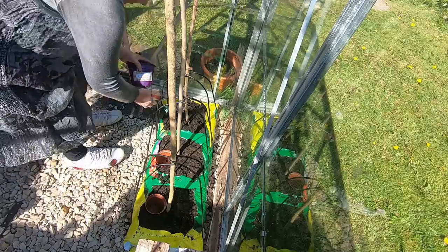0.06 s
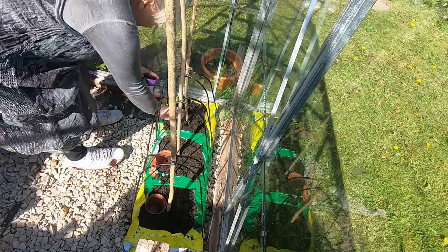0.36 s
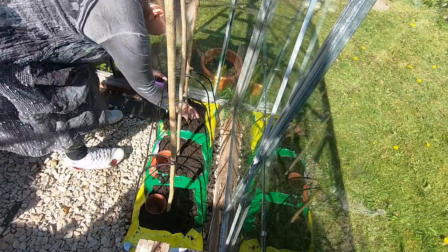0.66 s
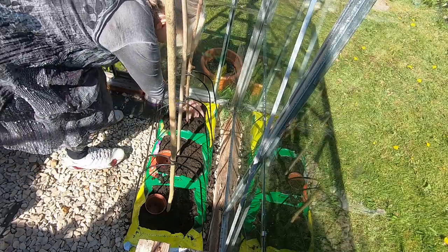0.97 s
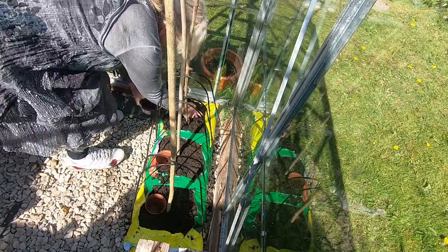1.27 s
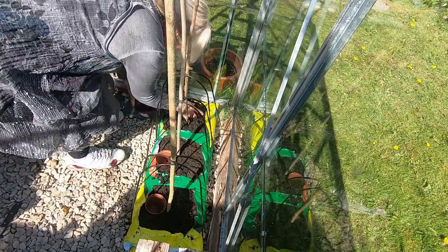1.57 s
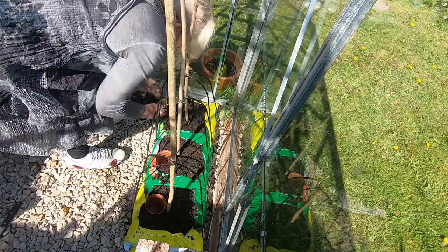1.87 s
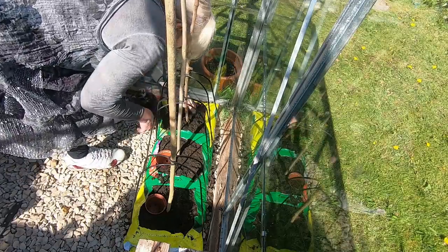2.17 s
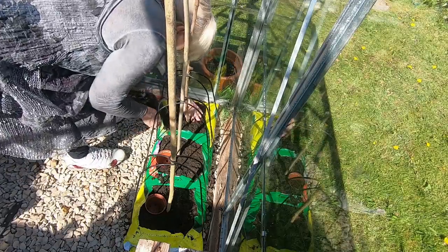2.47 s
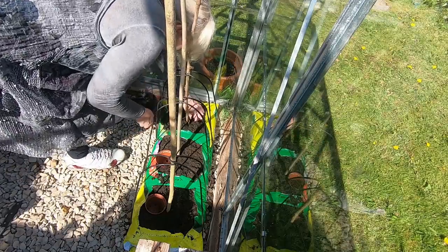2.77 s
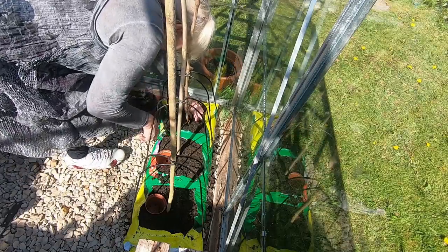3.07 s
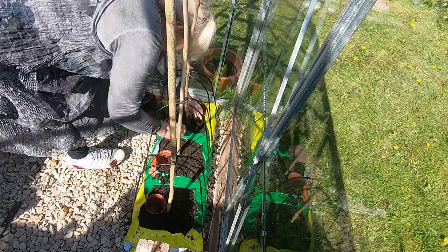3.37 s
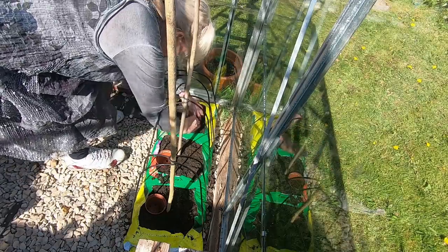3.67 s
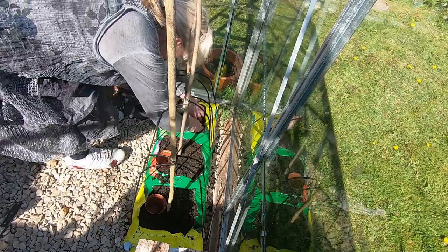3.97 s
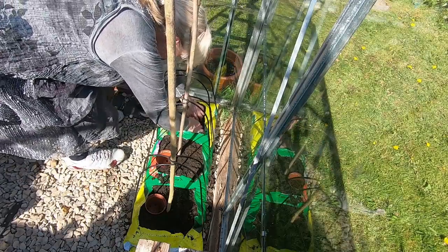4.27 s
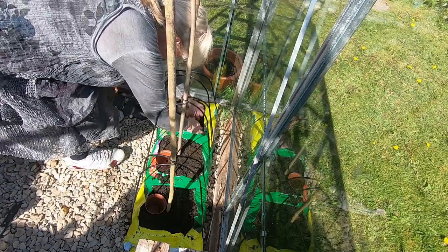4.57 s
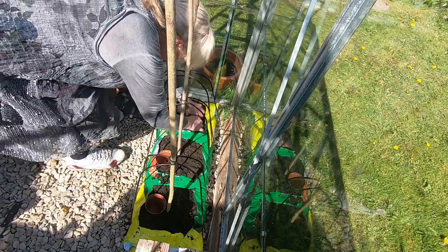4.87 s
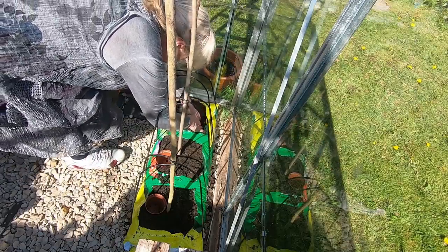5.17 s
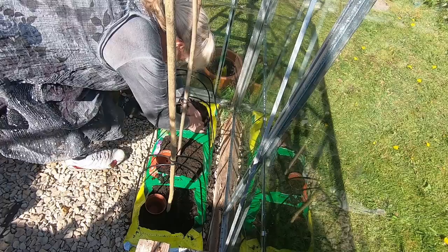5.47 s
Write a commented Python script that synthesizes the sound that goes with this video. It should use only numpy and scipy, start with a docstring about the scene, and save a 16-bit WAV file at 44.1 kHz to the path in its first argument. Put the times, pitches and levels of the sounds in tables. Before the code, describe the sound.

Quiet, close gardening sounds fill a small greenhouse: compost crumbles, sleeves and leaves swish, and a full plastic bag shifts dully, with scattered light ticks of plastic and grit. Outside, a light wind rumbles and a distant engine hums faintly throughout. A far bird whistles several short notes from the start until about 2.2 seconds. Soft pats come near 0.6 and 1.1 seconds, a gritty scrape at 1.6, and a quick cluster of dull pats between 2.6 and 2.8. After a short lull, a plastic pot is set down at 3.8 seconds, the loudest moment: a low hollow thump that rings briefly, a crunch of grit and a sharp clack of its rim on stone, with a tight echo off the glass. Gentler pats, scrapes and clicks follow around 4.4 and 5.2 seconds, and the rustling picks up again just before the end at about 5.7 seconds.

```python
"""A small greenhouse, where someone kneels and firms a plant into a bag of compost.
Sleeves and leaves swish, crumbs and plastic tick, hands pat the soil and push through grit.
A pot is set down with a hollow thump, and its rim clacks on stone; the knocks echo off the glass.
Outside, a light wind rumbles, an engine drones and a bird whistles far away."""
import sys
import numpy as np
from scipy import signal
from scipy.fft import rfft, irfft
from scipy.io import wavfile
from scipy.ndimage import uniform_filter1d

SR = 44100
rng = np.random.default_rng(int(sys.argv[2]) if len(sys.argv) > 2 else 0)


def master(y):
    """Save y as 16-bit WAV."""
    cut = np.clip(np.atleast_2d(y).T, -1, 1)
    pcm = np.round(cut * 32767)  # scale
    wavfile.write(sys.argv[1], SR, pcm.astype(np.int16))


N = 252322

# The tone of each noise layer. Each row: frequency in Hz, relative spectral level in dB.
CRUMB_TONE = [(250, -13), (600, -5), (1300, 10.5), (2200, 3.5), (3600, 1.5), (5300, -2.5), (7500, -13),
              (14000, -31.5)]
SWISH_TONE = [(2000, -21), (4500, -5), (6000, -4.5), (8000, -6), (10300, -5), (11700, -12), (13500, -13.5),
              (15000, -29)]
PLASTIC_TONE = [(2500, -9.5), (4300, -1.5), (5500, -7), (7000, -7), (8000, -3), (8800, -11), (11000, -25.5)]
BAG_TONE = [(60, -11), (120, 3.5), (180, 3.5), (280, 2.5), (400, -5), (600, -14.5), (1200, -16.5),
            (3000, -51.5)]
GARDEN_TONE = [(59, -28.5), (100, -8), (140, -18.5), (162, 1.5), (196, -8.5), (291, -9), (391, -7.5),
               (443, -5.5), (535, -5), (885, -7), (1880, -47), (3320, -47), (3840, -35.5), (15000, -61.5)]
WIND_TONE = [(12, -25.5), (28, -6.5), (44, 1.5), (60, -2), (80, -2), (100, -7.5), (135, -20), (300, -39),
             (1000, -87)]
GRIT_TONE = [(100, -16), (250, 9.5), (600, 4.5), (1400, -2), (2400, -3), (3600, -6), (5200, -7.5),
             (6400, -21.5), (10300, -28.5), (14000, -39)]
# Stereo width of diffuse sound. Each row: frequency in Hz, side over mid in dB.
WIDTH = [(60, -24), (150, -9.5), (280, -9.5), (450, -6.5), (750, 4.5), (1300, 1.5), (2400, -3),
         (4400, -5.5), (9000, 1)]
# How hard the hands work the compost. Each row: time in seconds, relative level in dB.
EFFORT = [(0.0, -7), (0.6, -7.5), (0.95, 0.5), (1.22, -7), (1.7, -2), (1.93, -11), (2.42, -11),
          (2.66, -0.5), (3.0, -13.5), (3.42, -13.5), (3.75, 2), (3.95, 0), (4.15, -6), (4.46, -4.5),
          (4.7, -3.5), (4.85, -13), (5.25, -10), (5.72, 0.5)]
# A sleeve or leaf slides past. Each row: start and length in seconds, level in dB.
STROKES = [(0.445, 0.078, -66), (0.575, 0.12, -64), (0.7, 0.095, -66.5), (0.87, 0.51, -73),
           (1.25, 0.42, -68.5), (1.61, 0.2, -65.5), (2.17, 0.42, -83), (2.57, 0.14, -74), (3.46, 0.17, -69),
           (3.61, 0.26, -64.5), (4.05, 0.093, -77), (4.17, 0.1, -69.5), (4.49, 0.029, -72),
           (4.64, 0.13, -73), (4.85, 0.6, -79.5), (5.55, 0.15, -76)]
# Gusts over the breeze. Each row: start and length in seconds, relative level in dB.
GUSTS = [(0.1, 0.55, -49), (0.59, 0.17, -48), (0.82, 0.29, -49.5), (1.15, 0.43, -49.5), (1.49, 0.15, -49.5),
         (2.08, 0.48, -52.5), (2.52, 0.61, -56), (3.63, 0.13, -47.5), (3.8, 0.52, -44), (4.35, 0.35, -46.5),
         (4.68, 0.24, -48.5), (5.17, 0.12, -54), (5.3, 0.63, -56)]
# The engine's swells. Each row: time in seconds, relative levels of fundamental and octave in dB.
ENGINE_LEVELS = [(0.0, -61, -81), (0.46, -47, -64.5), (0.56, -63, -67.5), (0.95, -55.5, -66),
                 (1.4, -77, -64.5), (1.8, -74, -80), (2.7, -55, -72.5), (3.2, -72.5, -73),
                 (5.72, -67, -83.5)]
# Bird notes. Each row: start and length in seconds, first and last pitch in Hz, relative level in dB.
BIRD_NOTES = [(0.064, 0.18, 2190, 2323, -64), (0.329, 0.31, 1886, 1920, -64.5),
              (0.86, 0.15, 1960, 1918, -62), (1.021, 0.152, 2026, 1935, -62),
              (1.146, 0.054, 5150, 5100, -70), (1.344, 0.15, 2093, 2095, -65.5),
              (1.871, 0.13, 2506, 2920, -65.5), (2.11, 0.077, 3850, 3670, -67.5)]
# Ticks of plastic and grit. Each row: start in seconds, relative level in dB, pitch in Hz,
# crisp edge against the body in dB, contact time in seconds.
TICKS = [(0.244, -60.5, 4130, -13, 0.0015), (0.33, -60, 4250, -24, 0.019), (0.442, -60.5, 2950, 6, 0.0022),
         (0.46, -56, 4500, -9, 0.0064), (0.719, -60, 5100, -29, 0.011), (0.739, -54, 2200, -14, 0.002),
         (0.892, -51, 2720, -0.5, 0.0025), (1.11, -56, 1480, -9, 0.0017),
         (1.3339, -50.5, 1450, -9, 0.00051), (1.675, -56, 9800, -23, .002),
         (2.507, -60.5, 2240, -36, .0025), (2.593, -57, 1510, -16, 0.002), (2.686, -47, 3740, -51, 0.0059),
         (2.794, -58.5, 2640, -18, 0.0027), (3.744, -54.5, 3420, -0.5, 0.016),
         (3.845, -45, 4000, 4.5, .001), (3.856, -44.5, 4040, -3.5, 0.0018), (4.062, -60, 5400, -25, 0.0045),
         (4.302, -64, 3450, 1, 0.013), (4.507, -49.5, 1342, -7, 0.00048), (4.7327, -48.5, 847, -38, 0.0005),
         (5.276, -63, 2120, -29.5, .001), (5.327, -64, 1944, -16, 0.0059), (5.611, -50.5, 1460, -27, 0.001)]
# The plastic pot's hollow resonances. Each row: centre and width in Hz, relative level in dB.
POT_RESONANCES = [(1360, 52, -4), (2040, 220, -17.5), (3480, 730, 0), (4880, 540, -11)]
# Soft blows on bag and ground. Each row: start in seconds, relative level in dB, pitch in Hz.
PATS = [(0.624, -51.5, 234), (1.11, -47.5, 304), (1.679, -52, 300), (2.151, -48, 170), (2.59, -46, 177),
        (2.613, -44.5, 254), (2.635, -40.5, 85.5), (2.724, -37.5, 171), (2.735, -44.5, 272),
        (2.83, -49.5, 174), (3.812, -38, 224), (3.83, -31.5, 164), (3.885, -37.5, 217.6),
        (3.93, -42.5, 252), (4.007, -40.5, 110), (4.367, -45, 134), (4.389, -45, 202), (5.185, -42.5, 60.4),
        (5.61, -55.5, 365)]
# Pushes through compost and gravel. Each row: start in seconds, relative level in dB,
# fade time in seconds, tilt in dB per octave, pot ring against the grit in dB.
SCRAPES = [(1.601, -43.5, 0.0031, 4.5, -8), (1.616, -50, 0.029, 2.5, -10), (1.681, -51, 0.031, -4.5, 3),
           (1.71, -52.5, 0.028, 1.5, -7), (2.338, -60.5, 0.045, -6, -28), (2.688, -53, 0.02, 0.5, -26),
           (3.8156, -30, 0.0066, 1.6, -11), (3.835, -45.5, 0.032, -1.5, -26),
           (3.895, -44, 0.042, -3.5, -29), (4.386, -63.5, 0.088, -1.5, -33), (4.447, -49, 0.0086, -4, -28)]
# The landing's boom. Each row: frequency in Hz, relative level in dB, seconds to fall by 60 dB.
BOOM_MODES = [(82.85, -2.5, 1.1), (158.4, -1, 0.68), (180.6, -3.5, 0.84), (245, -2.5, 0.31),
              (313, -11.5, 0.67), (421, -20, 0.36), (476, -3.5, 0.34), (713, -23.5, 1.2), (847, -21, 0.45)]
# The rim's hits on stone. Each row: start in seconds, relative level in dB, pitch in Hz.
RIM_HITS = [(3.8632, -11, 3250), (3.86433, -11, 3250)]
# The greenhouse's reverb. Each row: frequency in Hz, seconds to fall by 60 dB.
ROOM_DECAY = [(100, 0.53), (300, 0.13), (800, 0.16), (3000, 0.13), (10000, 0.16)]
# The microphone's treble roll-off. Each row: frequency in Hz, gain in dB.
MICROPHONE = [(10400, 0), (11600, -5.5), (13000, -6), (15000, -12)]


def amp(db):
    """Decibels to gain."""
    return 10 ** (np.asarray(db) / 20)


def unit_rms(x):
    """Scales to rms 1."""
    return x / np.sqrt(np.mean(x ** 2) + 1e-20)


def curve_at(points, hz):
    """Reads a curve on a log-frequency axis."""
    point_hz, value = np.transpose(points)
    return np.interp(np.log(hz + 1), np.log(point_hz + 1), value)


def fader(rows, column=1):
    """One dB column of a timeline as a gain for each sample."""
    rows = np.array(rows)
    return amp(np.interp(np.arange(N) / SR, rows[:, 0], rows[:, column]))


def equalise(x, tone):
    """Filters by a tone curve."""
    size = x.shape[-1]
    return irfft(rfft(x) * amp(curve_at(tone, np.fft.rfftfreq(size, 1 / SR))), size)


def band(x, lo_hz, hi_hz, order=1):
    """Causal band-pass."""
    sections = signal.butter(order, [lo_hz, min(hi_hz, .48 * SR)], "band", fs=SR, output="sos")
    return signal.sosfilt(sections, x)


def hit_at_level(x, db):
    """Gives a short sound the energy of 10 ms at this level."""
    return amp(db) * x * np.sqrt(0.01 * SR / np.sum(x ** 2))


def add(mix, start_s, sound):
    """Mixes a sound in at its cue."""
    part = mix[round(start_s * SR):][:len(sound)]
    part += sound[:len(part)]


def spread(pair):
    """A mid and a side signal become left and right, alike in the bass."""
    side = equalise(pair[1], WIDTH)
    return np.array([pair[0] + side, pair[0] - side])


def grains(size, per_s, spread_db):
    """Sparse clicks of random sign and uneven size."""
    heights = amp(spread_db * np.minimum(rng.exponential(1, size), 4)) * rng.choice([-1, 1], size)
    return unit_rms(heights * (rng.random(size) < per_s / SR))


def flutter(depth_db, step_s):
    """A gain that wavers at random."""
    knots = np.arange(0, N + SR, step_s * SR)
    return amp(depth_db * np.interp(np.arange(N), knots, rng.standard_normal(N)[:len(knots)]))


def swells(rows, skew):
    """A gain that rises and falls in one arch per row; a skew below 1 peaks early."""
    power = np.zeros(N)
    for start_s, length_s, db in rows:
        progress = np.linspace(0, 1, round(length_s * SR))
        add(power, start_s, (amp(db) * np.sin(np.pi * progress ** skew)) ** 2)
    return np.sqrt(power)


def diffuse(tone):
    """Noise of this tone arriving from all around."""
    return spread([unit_rms(equalise(rng.standard_normal(N), tone)) for _ in range(2)])


def grain_bed(tone, per_s, spread_db):
    """Grains of this tone arriving from all around."""
    return spread([unit_rms(equalise(grains(N, per_s, spread_db), tone)) for _ in range(2)])


def rustle(crumbs_db=-66, cloth_db=-74, drag_s=2.54, drag_length_s=0.42, drag_db=-66.5):
    """Crumbs break as grains, cloth and leaves slide as a finer hiss, plastic sizzles under a palm."""
    crumbs = grain_bed(CRUMB_TONE, per_s=2900, spread_db=-1.0)
    swish = grain_bed(SWISH_TONE, per_s=15000, spread_db=-2.5)
    uneven = flutter(depth_db=1.3, step_s=.018)
    effort = fader(EFFORT)
    sliding = np.hypot(amp(cloth_db) * effort ** 0.92, swells(STROKES, skew=0.75))
    drag = swells([(drag_s, drag_length_s, drag_db)], skew=0.75) * diffuse(PLASTIC_TONE)
    return uneven * (amp(crumbs_db) * effort * crumbs + sliding * swish + drag)


def crackle():
    """Now and then a larger crumb or a crease of the bag snaps, as loud as the hands are busy."""
    snaps = unit_rms(band(grains(N, per_s=110, spread_db=3), 1800, 7000, order=3))
    return amp(-73.5) * fader(EFFORT) * snaps


def bag(db_per_effort_db=0.45):
    """The full bag shifts dully under the hands."""
    uneven = flutter(depth_db=1.5, step_s=.035)
    return amp(-59) * fader(EFFORT) ** db_per_effort_db * diffuse(BAG_TONE) * uneven


def garden_wind():
    """Gusts rumble over a light breeze and the steady wash of the garden."""
    breeze = amp(-59.5)
    wind = np.hypot(breeze, swells(GUSTS, skew=0.84)) * flutter(depth_db=-1.5, step_s=0.035)
    return amp(-70) * diffuse(GARDEN_TONE) + amp(-2.0) * wind * diffuse(WIND_TONE)


def engine(pitch_hz=76.3, waver=0.0057):
    """A far engine hums on a drifting pitch and its octave, swelling and fading on the moving air."""
    t = np.arange(N) / SR
    drift = np.interp(t, np.linspace(0, t[-1], num=20), rng.standard_normal(20))
    phase = 2 * np.pi * np.cumsum(pitch_hz * (1 + waver * drift)) / SR
    fundamental = fader(ENGINE_LEVELS, column=1) * np.sin(phase)
    octave = fader(ENGINE_LEVELS, column=2) * np.sin(2 * phase)
    return np.sqrt(2) * (fundamental + octave) * flutter(depth_db=4.5, step_s=.09)


def bird(arch=0.015, waver=0.022, echo_t60_s=0.39):
    """Near-pure whistles, each a slightly arched glide, arrive mostly as echoes off trees and walls."""
    song = np.zeros(N)
    for start_s, length_s, first_hz, last_hz, db in BIRD_NOTES:
        progress = np.linspace(0, 1, round(length_s * SR))
        wobble = waver * unit_rms(uniform_filter1d(rng.standard_normal(SR), size=150))[:len(progress)]
        glide_hz = first_hz + (last_hz - first_hz) * progress
        hz = glide_hz * (1 + arch * np.sin(np.pi * progress) + wobble)
        whistle = np.sqrt(2) * np.sin(2 * np.pi * np.cumsum(hz) / SR)
        add(song, start_s, whistle * amp(db) * np.sin(np.pi * progress ** 1.25))  # loudest late
    t = np.arange(SR // 2) / SR
    tail = rng.standard_normal((2, len(t))) * 10 ** (-3 * t / echo_t60_s)
    echoes = signal.fftconvolve(song[None], tail / np.linalg.norm(tail[0]), axes=1)[:, :N]
    return amp(-2.0) * (.5 * song + echoes)


def ticks(flex_db=-5, hollow_db=-11, snap_db=-5):
    """A brief rough contact rings a well damped patch of plastic and the pot, with a crisp edge on top."""
    out, t = np.zeros(N), np.arange(3000) / SR
    for start_s, db, hz, crisp_db, contact_s in TICKS:
        force = rng.standard_normal(len(t)) * np.exp(-t / contact_s)
        force[0] = amp(snap_db) * np.linalg.norm(force)  # the first touch is a clean snap
        body = unit_rms(band(force, hz * 0.51, hz * 1.16, order=2))
        flex = unit_rms(band(force, hz * .25, hz * 1.7, order=2))  # the wider sheet gives way too
        edge = unit_rms(band(force, 5200, 10000, order=3))
        tick = body + amp(flex_db) * flex + amp(hollow_db) * pot_ring(flex) + amp(crisp_db) * edge
        add(out, start_s, hit_at_level(tick, db))
    return out


def pot_ring(force):
    """The pot's thin wall rings briefly at its resonances."""
    return unit_rms(sum(amp(db) * band(force, hz - width / 2, hz + width / 2) / np.sqrt(width)
                        for hz, width, db in POT_RESONANCES))


def pats(puff_db=-6, puff_s=0.014, swell_cycles=0.65):
    """A soft blow gives a low push a few cycles long, and a dull puff as the compost gives way."""
    out, t = np.zeros(N), np.arange(6000) / SR
    for start_s, db, hz in PATS:
        age = t * hz / swell_cycles
        push = unit_rms(age * np.exp(-age) * np.sin(2 * np.pi * hz * t))
        burst = rng.standard_normal(len(t)) * np.exp(-t / puff_s)
        puff = unit_rms(band(burst, hz * 0.5, hz * 1.33, order=2))
        add(out, start_s, hit_at_level(push + amp(puff_db) * puff, db))
    return out


def scrapes(attack_s=0.00033):
    """Each push starts abruptly and runs out in a shower of grit that rasps on the pot."""
    out, t = np.zeros(N), np.arange(8192) / SR
    for start_s, db, fade_s, tilt_db, hollow_db in SCRAPES:
        tone = [(hz, tone_db + tilt_db * np.log2(hz / 2000)) for hz, tone_db in GRIT_TONE]
        grit = unit_rms(equalise(grains(len(t), per_s=6000, spread_db=-3.0), tone))
        rasp = unit_rms(grit + amp(hollow_db) * pot_ring(grit))
        add(out, start_s, amp(db) * rasp * np.exp(-t / fade_s) * (1 - np.exp(-t / attack_s)))
    return out


def pot_boom(start_s=3.818, attack_s=.004):
    """Low, hollow modes ring on after the pot lands."""
    out, t = np.zeros(N), np.arange(SR) / SR
    ring = sum(amp(db) * 10 ** (-3 * t / t60) * np.sin(2 * np.pi * hz * t) for hz, db, t60 in BOOM_MODES)
    add(out, start_s, amp(-34.5) * ring * (1 - np.exp(-t / attack_s)))
    return out


def rim_clack(length_s=0.0017, splinter_db=-10.5, scatter_db=-11):
    """The hard rim chatters on stone: bursts of a few cycles, their splintery top scattered wide."""
    centre, sides, t = np.zeros(N), np.zeros(N), np.arange(400) / SR
    envelope = np.sin(np.pi * np.minimum(t / length_s, 1)) ** 2
    for start_s, db, hz in RIM_HITS:
        splinter, scatter = unit_rms(band(rng.standard_normal((2, len(t))), 2800, 11000, order=2))
        strike = np.sin(2 * np.pi * hz * t) + amp(splinter_db) * splinter
        add(centre, start_s, amp(db) * envelope * strike)
        add(sides, start_s, amp(db + scatter_db) * envelope * scatter)
    return spread([centre, sides])


def glass_echoes(send, predelay_s=0.00091, echoes_per_s=5000):
    """Dense early echoes off the near panes; the bass lingers longest."""
    size = SR // 2
    taps = rng.choice([-1., 1.], (2, size)) * (rng.random((2, size)) < echoes_per_s / SR)
    hz, t, spectra = signal.stft(taps, SR, nperseg=256)
    decay = 10 ** (-3 * t / curve_at(ROOM_DECAY, hz)[:, None])
    _, tail = signal.istft(spectra * decay, SR, nperseg=256)
    tail *= np.arange(tail.shape[1]) > predelay_s * SR
    return signal.fftconvolve(send[None], spread(tail / np.linalg.norm(tail[0])), axes=1)[:, :N]


def scene():
    """Clicks, scrapes, pats and the clack echo off the glass, over dry handling and the garden bed."""
    clicks, grit, thuds, clack = ticks() + crackle(), scrapes(), pats(), rim_clack()
    direct = amp(-3.0) * clicks + amp(3.5) * grit + amp(-0.5) * (thuds + clack) + pot_boom()
    send = amp(-1.5) * clicks + amp(2.0) * grit + amp(-5.0) * thuds + amp(-3.5) * clack[0]
    return direct + glass_echoes(send) + rustle() + bag() + garden_wind() + engine() + bird()


def record(dry, cutoff_hz=15000):
    """The microphone softens the top end, and a steep low-pass cuts it off."""
    lowpass = signal.firwin(255, cutoff_hz, window=("kaiser", 8), fs=SR)
    return signal.oaconvolve(equalise(dry, MICROPHONE), lowpass[None], "same")


dry = scene()
out = record(dry)
master(out)
```